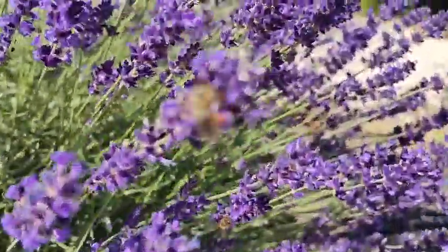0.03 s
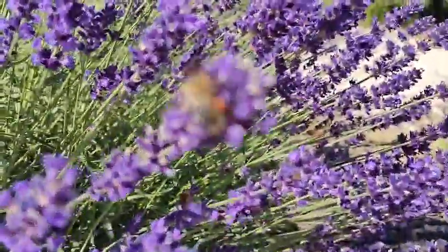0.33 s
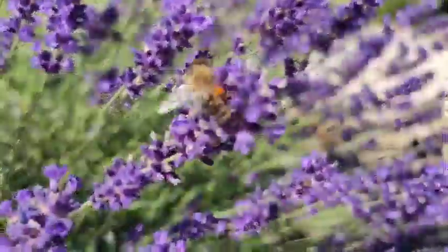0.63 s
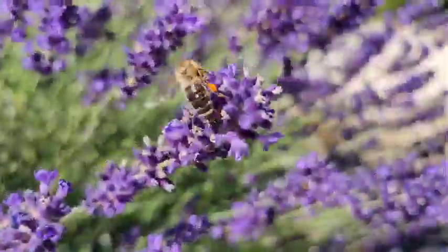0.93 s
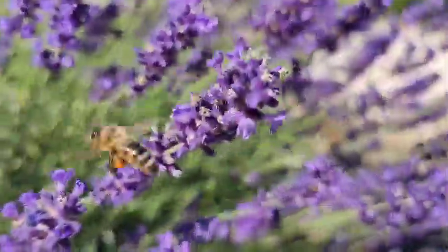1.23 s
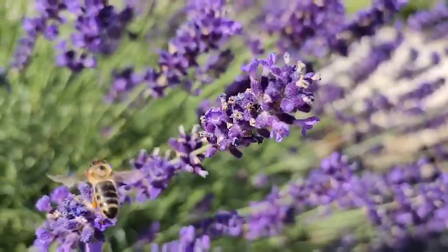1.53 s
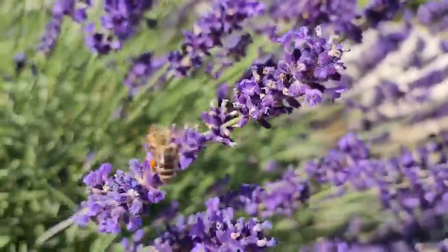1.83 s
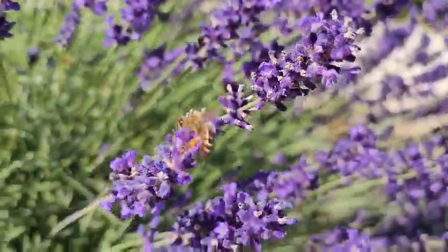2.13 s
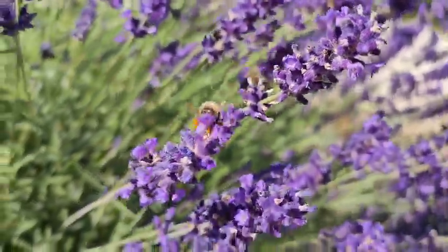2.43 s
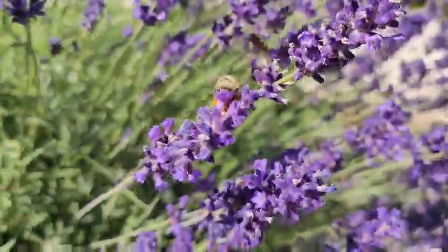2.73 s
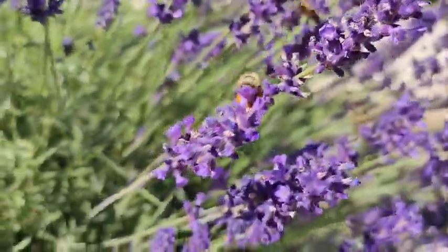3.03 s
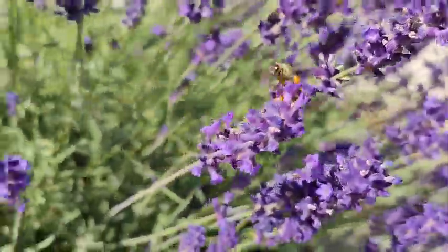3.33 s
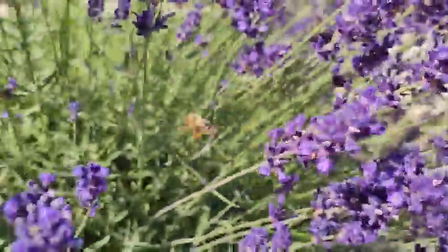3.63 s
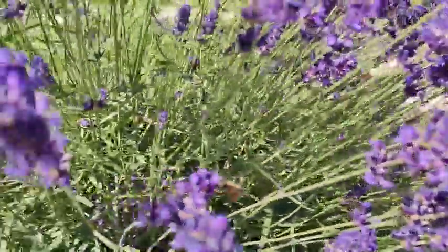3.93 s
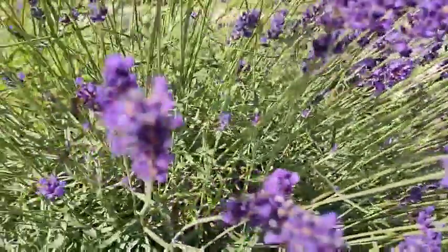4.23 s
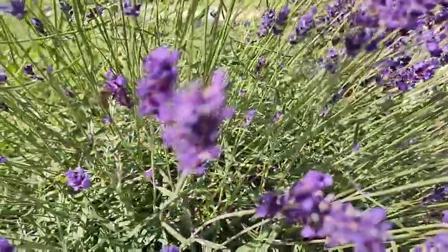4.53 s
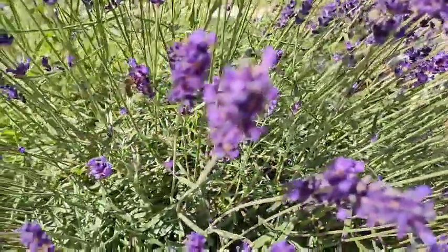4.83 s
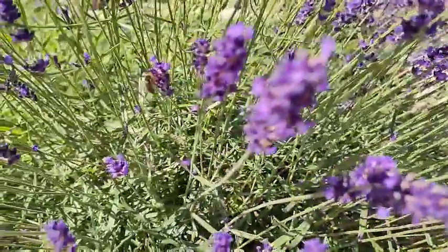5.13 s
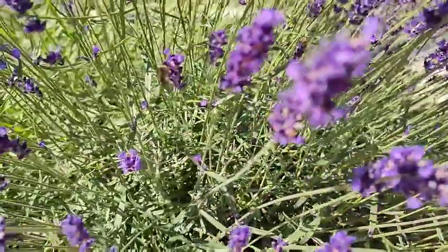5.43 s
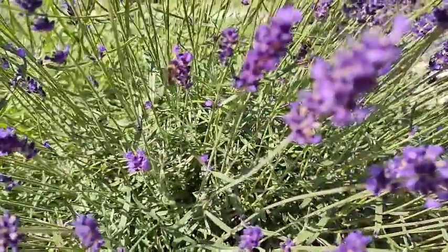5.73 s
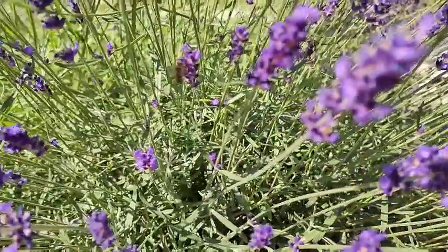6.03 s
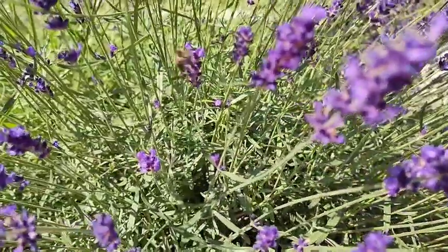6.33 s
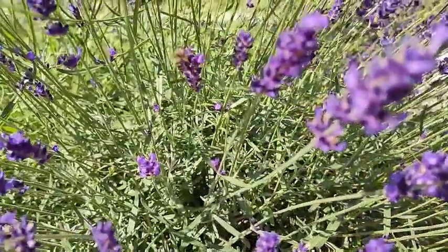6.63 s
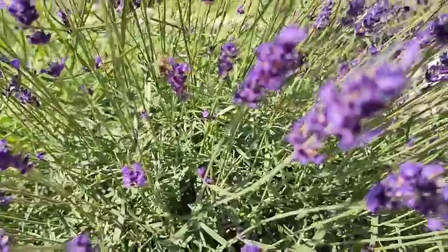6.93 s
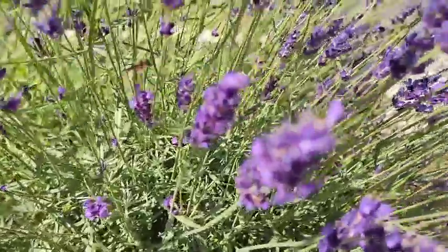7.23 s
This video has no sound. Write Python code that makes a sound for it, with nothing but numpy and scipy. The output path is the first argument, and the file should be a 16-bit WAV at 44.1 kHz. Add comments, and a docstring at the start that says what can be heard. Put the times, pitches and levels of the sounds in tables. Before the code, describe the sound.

Close to a flower bed outdoors, a burst of sharp knocks and scratchy brushing comes early on the right as a stalk hits the microphone, far louder than anything else. Around it the garden is quiet: bees buzz on and off, sometimes two at once, and leaves hiss in a gentle breeze. Two faraway engines hum over a low rumble, growing just after the knocks and then easing away.

```python
"""Honeybees in lavender.

Bees fly from flower to flower, each a harmonic buzz on an unsteady wingbeat. Leaves hiss and
stems rustle and tick in a breeze. Two distant engines drone in their lowest orders over a rumble.
A flower stalk knocks and brushes the right microphone port; the bass drops, then partly returns."""
import sys
import numpy as np
from scipy import signal
from scipy.fft import rfft, irfft
from scipy.io import wavfile

SR = 44100
rng = np.random.default_rng(int(sys.argv[2]) if len(sys.argv) > 2 else 0)


def transcribe(signal):
    """Save signal, clipped to [-1, 1], as a 16-bit WAV file at the path in sys.argv[1]."""
    frames = np.atleast_2d(signal).T
    limited = np.clip(frames, -1, 1)
    pcm = np.round(limited * 32767).astype(np.int16)
    wavfile.write(sys.argv[1], SR, pcm)


N = 321930
TIME_S, FREQS_HZ = np.arange(N) / SR, np.fft.rfftfreq(N, 1 / SR)

# wing radiation: (frequency [Hz], gain [dB])
WING_SPECTRUM = [(190, -3.5), (350, 1), (400, 1.5), (530, -3), (610, -8.5), (760, -15), (870, -13),
                 (980, -10), (1120, -16.5), (1320, -16.5), (2000, -25.5), (2800, -34)]
# flights: (peak effort [s], rise [s], fall [s], top wingbeat [Hz], level [dB],
# upper-harmonic gain from facing the microphone [dB])
BEE_FLIGHTS = [(.08, 0.11, 0.18, 188.1, -66, 5), (.44, 0.23, 0.18, 195.7, -61.5, 3.5),
               (.76, 0.2, 0.24, 194.3, -65, 7), (1.48, 0.27, 0.31, 203.6, -63.5, 7),
               (1.82, 0.086, 0.27, 173.5, -66, -1), (1.9, .14, 0.22, 189.7, -63.5, -8),
               (2.31, 0.22, 0.28, 200.4, -66, 9), (2.66, .28, .34, 198, -65.5, 0),
               (3.3, 0.34, 0.32, 196, -64, -3), (3.48, 0.36, 0.33, 189.2, -63.5, -6),
               (3.93, 0.28, .3, 197.2, -63.5, 2), (3.94, 0.23, 0.26, 184.6, -63, 0),
               (4.36, .11, 0.14, 212.3, -60, 4.5), (4.48, .09, 0.14, 193.6, -63, 5.5),
               (4.9, 0.34, 0.56, 193.3, -75, 3), (5.41, .11, 0.143, 181, -61.5, 0.5),
               (5.5, .19, 0.154, 184.6, -69, 2), (5.67, .18, 0.27, 177.3, -64.5, 4),
               (5.8, .26, 0.19, 197.5, -64, 2), (6.17, .33, .33, 184.4, -61.5, -2),
               (6.54, .15, 0.13, 184, -59.5, -8), (6.73, .15, 0.15, 183.2, -60.5, 0),
               (6.9, 0.095, 0.14, 184.2, -59, 1.5), (7.3, .2, .2, 178, -60, -2.5)]
# engine easing off, picking up: (time [s], cycle rate [Hz], firing note [dB], other orders [dB])
ENGINE_CURVE = [(0, 53.2, -48.5, -55), (.55, 52.93, -45, -55), (1.3, 51.8, -52.5, -61),
                (1.85, 51.2, -49, -53.5), (2.45, 50.4, -39, -53.5), (3.05, 49.7, -46.5, -55.5),
                (3.3, 43.3, -52.5, -52), (4.0, 38, -59, -54.5), (4.65, 36.7, -54, -62.5),
                (5.5, 40.7, -56, -63), (6.6, 41.7, -51, -61.5), (7.3, 42.2, -55.5, -60)]
# exhaust pipe resonances: (frequency [Hz], gain [dB])
EXHAUST_RESPONSE = [(40, -23), (55, -9), (112, 5), (135, 1), (155, -0.5), (182, -8.5), (208, -6.5),
                    (260, -20.5)]
# second engine, one row a gear: (loudest at [s], rise [s], fall [s], firing rate then [Hz],
# climb [Hz/s], level [dB])
GEAR_PULLS = [(2.28, 1.5, 1.02, 62.56, 12.3, -39), (5.38, .38, .55, 54.8, 8.4, -55)]
# low rumble: (frequency [Hz], level [dB])
RUMBLE_SPECTRUM = [(18, -118), (30, -103), (42, -79.5), (70, -76.5), (110, -77), (160, -80.5), (205, -84),
                   (250, -87), (400, -92), (900, -116), (4000, -150)]
# grip shifts that swell the rumble: (time [s], half width [s], gain [dB])
GRIP_SHIFTS = [(.87, 0.045, 8.5), (5.42, 0.11, 2)]
# diffuse sound at the two ports: (frequency [Hz], correlation [1])
PORT_CORRELATION = [(100, 0.76), (250, 0.62), (500, 0.58), (1000, 0), (2000, 0)]
# leaf hiss: (frequency [Hz], level [dB])
LEAF_SPECTRUM = [(100, -104), (300, -95), (500, -99), (700, -97.5), (1000, -94.5), (1400, -99.5),
                 (2000, -101), (3200, -107), (4500, -108), (5200, -111), (6600, -112), (8500, -121),
                 (12000, -126), (16000, -128)]
# leaf hiss over time: (time [s], gain [dB])
LEAF_GAIN = [(0, 4.5), (2.3, 2), (3.4, 4.5), (4.25, .3), (5.8, .5), (6.9, -0.7), (7.3, 2)]
# rustle of the nearest stems: (frequency [Hz], level [dB])
STEM_SPECTRUM = [(1500, -125), (3300, -111), (5000, -110), (6700, -109), (8300, -113), (10000, -124),
                 (15000, -130)]
# puffs of breeze on the stems: (time [s], half width [s], gain [dB])
PUFFS = [(1.75, .22, 2), (3.0, 0.5, 3), (3.8, 0.46, 2), (5.85, .25, 4), (7.2, 0.61, 0)]
# narrow treble sizzle: (frequency [Hz], gain [dB])
SIZZLE_SPECTRUM = [(2500, -43.5), (3900, -15.5), (4350, -7.5), (4600, -2), (4850, -13.5), (5400, -13),
                   (8000, -41)]
# its flares: (time [s], half width [s], level [dB])
SIZZLE_FLARES = [(5.4, 0.11, -69.5), (5.9, 0.11, -71)]
# stem ticks: (time [s], level [dB])
STEM_TICKS = [(0.114, -45.5), (1.94, -53), (2.189, -48), (2.38, -52), (5.574, -52)]
# stalk strikes: (time [s], level [dB], thud [dB], thud corner [Hz], edge [dB], snap [dB], scrape [dB])
STALK_KNOCKS = [(0.8134, -20.5, 13, 600, 12, 16, -1), (.8325, -17.5, 14.5, 900, 12, 10, -5),
                (0.9059, 0, 21, 567, 17.5, 16, -3), (0.9544, 2, 18.5, 820, 12.5, 17.5, -3),
                (1.001, 18, 1.5, 800, -2.5, 4.5, -2.5), (1.0356, -2.5, 5, 500, 13.5, 4, -3.5),
                (1.1141, 18, -1, 597.5, -2.5, -5, -12), (1.2762, -13, 21, 1054, 10, 22, -6),
                (1.4297, -17, 20, 803.6, 12, 3, -6), (1.4668, 6.5, 20, 430, 3, 20.5, -6.5)]
# plain blow on the case: (frequency [Hz], gain [dB])
CASE_RESPONSE = [(60, -27), (250, -13.5), (500, -14), (950, -7.5), (1500, -2.5), (2200, 2), (3000, -4.5),
                 (3800, -5), (4600, -2), (5400, -11.5), (6500, -15), (8500, -34), (12000, -35.5),
                 (15500, -35.5)]
# microphone port resonances: (frequency [Hz], level [dB], T60 [s])
PORT_MODES = [(2540, -52, .025), (4620, -41.5, .03)]
# stalk rubbing the case: (frequency [Hz], gain [dB])
BRUSH_SPECTRUM = [(200, -9), (700, -5), (1800, 4), (3000, 1), (4000, 7), (4600, 8.5), (5500, 2.5),
                  (6600, 0), (8000, -22.5), (15000, -18.5)]
# strokes over the case: (time [s], half width [s], level [dB])
STALK_STROKES = [(.845, 0.022, -53.5), (.97, 0.074, -50), (1.09, 0.03, -52), (1.27, 0.0052, -46),
                 (1.32, 0.026, -51), (1.41, 0.011, -48)]
# stalk resting and creeping on the case: (time [s], half width [s], level [dB])
STALK_CREEP = [(1.2, 0.24, -57)]
# microphone, dull in one treble band: (frequency [Hz], gain [dB])
MIC_RESPONSE = [(6900, -1), (7600, -10.5), (9000, -10), (10300, -12.5), (10500, 0)]


def amp(db):
    return 10 ** (np.asarray(db) / 20)


def unit_rms(x):
    return x / np.sqrt(np.mean(x ** 2) + 1e-20)


def log_interp(points, hz):
    knots_hz, values = np.transpose(points)
    return np.interp(np.log(hz + 1), np.log(knots_hz + 1), values)


def follow(rows):
    """Each value column at every sample."""
    times_s, *columns = np.transpose(rows)
    return [np.interp(TIME_S, times_s, column) for column in columns]


def colour(x, spectrum):
    return irfft(rfft(x) * amp(log_interp(spectrum, FREQS_HZ)), N)


def drift(rate_hz, at_s=TIME_S, size=7300):
    """Slow random curve, rms 1."""
    hz = np.fft.rfftfreq(size, TIME_S[-1] / size)
    slow = irfft(rfft(rng.standard_normal(size)) * np.exp(-(hz / rate_hz) ** 2), size)
    return np.interp(at_s, np.linspace(0, TIME_S[-1], size), unit_rms(slow))


def swells(rows, rest_db=-np.inf):
    """Gain: Gaussian swells summed in power over a resting level."""
    power = sum(amp(db) ** 2 * np.exp(-((TIME_S - at_s) / width_s) ** 2) for at_s, width_s, db in rows)
    return np.sqrt(amp(rest_db) ** 2 + power)


def add(mix, at_s, sound):
    part = mix[max(round(at_s * SR), 0):][:len(sound)]
    part += sound[:len(part)]


def min_phase_pulse(gain_db):
    log_gain = np.log(amp(np.r_[gain_db, gain_db[-2:0:-1]]))
    return np.fft.ifft(np.exp(np.conj(signal.hilbert(log_gain)))).real


def diffuse(spectrum):
    """Noise from all around; the ports correlate only below 1 kHz."""
    left, other = rfft(rng.standard_normal((2, N)))
    correlation = log_interp(PORT_CORRELATION, FREQS_HZ)
    right = correlation * left + np.sqrt(1 - correlation ** 2) * other
    return colour(irfft(np.array([left, right]), N), spectrum) * np.sqrt(SR / 2)


def buzz(t, wing_hz, level_db, facing_db, jitter=0.01536, fade_db=2.5, scatter_rad=0.38):
    """Wingbeat harmonics; each swells and fades as the bee turns among the stems."""
    beats = np.cumsum(wing_hz * (1 + jitter * drift(32.1, t))) / SR
    out = np.zeros((2, len(t)))
    for k in range(1, 15):
        tone_db = log_interp(WING_SPECTRUM, k * wing_hz) + facing_db * np.clip((k - 3) / 4, 0, 1)
        gain = np.sqrt(2) * amp(level_db + tone_db + fade_db * drift(6.1, t))
        phase = 2 * np.pi * (k * beats + rng.random())
        for port in out:  # plant echoes bend the phase differently at each port
            port += gain * np.cos(phase + scatter_rad * np.sqrt(k) * drift(25, t))
    return out * amp([[0.54], [-0.54]])


def bees(sag_hz=20.97, sag_db=-5, start_s=0.027, stop_s=0.029, wobble=0.01008):
    """Short flights, often two at once; wings are slower and quieter at take-off and landing."""
    out = np.zeros((2, N))
    for peak_s, rise_s, fall_s, top_hz, db, facing_db in BEE_FLIGHTS:
        aloft = (TIME_S > peak_s - rise_s) & (TIME_S < peak_s + fall_s)
        t = TIME_S[aloft]
        slack = np.maximum((peak_s - t) / rise_s, (t - peak_s) / fall_s) ** 1.8
        gate = np.clip(np.minimum((t - peak_s + rise_s) / start_s, (peak_s + fall_s - t) / stop_s), 0, 1)
        trim = 1 + wobble * drift(14.1, t)  # a hovering bee keeps trimming its wingbeat
        wing_hz = (top_hz - sag_hz * slack) * trim
        out[:, aloft] += gate * buzz(t, wing_hz, db + sag_db * slack, facing_db)
    return out


def engine_order(hz, level_db, waver_db=4.0):
    """One sine, wavering on its long path through the air."""
    gain = np.sqrt(2) * amp(level_db + waver_db * drift(3.9))
    return gain * np.sin(2 * np.pi * (np.cumsum(hz) / SR + rng.random()))


def easing_engine():
    """Two firings a cycle; the exhaust pipe shapes the other low orders."""
    cycle_hz, firing_db, others_db = follow(ENGINE_CURVE)
    out = engine_order(2 * cycle_hz, firing_db, waver_db=1.2)
    for k in (1, 3, 4, 5):
        exhaust_db = log_interp(EXHAUST_RESPONSE, k * cycle_hz)
        out += engine_order(k * cycle_hz, others_db + exhaust_db, waver_db=2.5)
    return out


def rumble():
    """Low noise; swells as the hand shifts its grip."""
    return diffuse(RUMBLE_SPECTRUM) * swells(GRIP_SHIFTS, rest_db=2)


def breeze():
    """Leaves hiss; puffs rustle the nearest stems."""
    leaves = diffuse(LEAF_SPECTRUM) * amp(follow(LEAF_GAIN)[0] + 0.263 * drift(11))
    stems = diffuse(STEM_SPECTRUM) * swells(PUFFS, rest_db=-12.5) * amp(1.3 * drift(25))
    return leaves + stems * amp([[-1], [1]])


def sizzle():
    """Flickering noise band near 4.6 kHz; flares twice."""
    band = unit_rms(diffuse(SIZZLE_SPECTRUM))
    return band * swells(SIZZLE_FLARES, rest_db=-74.5) * amp(1.1 * drift(32)) * amp([[-1.5], [1]])


def mic_fizz():
    """Even self-noise of the microphones."""
    return diffuse([(1000, -118), (9000, -118), (11000, -117.5), (13000, -118.5), (15000, -116.5)])


def stem_ticks(t60_s=0.018):
    """Faint, bright noise bursts among the stems."""
    out, t = np.zeros(N), np.arange(2048) / SR
    for at_s, db in STEM_TICKS:
        add(out, at_s, amp(db - 60 * t / t60_s) * rng.standard_normal(len(t)))
    return colour(out, [(1000, -25), (3000, -8), (4700, 2), (6500, 1), (14000, -29)]) * amp([[-5], [0]])


def pulling_engine(fade_db_per_s=18.5, clutch_s=0.12, echo_s=0.0686):
    """The firing note climbs in each gear; a wall echo cancels it at some pitches."""
    direct = np.zeros(N)
    for peak_s, rise_s, fall_s, hz, climb_hz_per_s, db in GEAR_PULLS:
        t = TIME_S - peak_s
        firing_hz = hz + climb_hz_per_s * np.clip(t, -rise_s, fall_s)
        level_db = db - fade_db_per_s * abs(t)
        in_gear = np.clip(np.minimum(t + rise_s, fall_s - t) / clutch_s, 0, 1)
        direct += in_gear * engine_order(firing_hz, level_db, waver_db=0.7)
        direct += in_gear * engine_order(2 * firing_hz, level_db - 23.5)
    return direct + np.interp(TIME_S - echo_s, TIME_S, direct)


def stalk_knocks(size=4096, scrape_rise_s=0.0057, scrape_t60_s=0.016):
    """The stalk scrapes, then snaps against the case; the port rings faintly."""
    hz, right = np.fft.rfftfreq(size, 1 / SR), np.zeros(N)
    t = (np.arange(size) - size // 8) / SR
    ring = (t > 0) * sum(amp(db - 60 * abs(t) / t60_s) * np.cos(2 * np.pi * mode_hz * t)
                         for mode_hz, db, t60_s in PORT_MODES)
    scrape_envelope = amp(-60 * np.maximum(t / scrape_t60_s, -t / scrape_rise_s))
    highpass = signal.butter(2, 700, "high", fs=SR)  # friction carries no bass
    for at_s, db, thud_db, corner_hz, edge_db, snap_db, scrape_db in STALK_KNOCKS:
        blunt_db = log_interp([(corner_hz, thud_db), (3.04 * corner_hz, 0)], hz)  # air pushed into port
        grazing_db = log_interp([(3700, 0), (6200, edge_db), (15000, snap_db)], hz)
        pulse = min_phase_pulse(log_interp(CASE_RESPONSE, hz) + blunt_db + grazing_db)
        scrape = signal.lfilter(*highpass, rng.standard_normal(size) * scrape_envelope)
        force = amp(scrape_db) * scrape / np.linalg.norm(scrape) + (t == 0) + ring
        add(right, at_s + t[0], amp(db) * signal.fftconvolve(force, pulse))
    left = colour(right, [(300, -21), (1000, -33), (3000, -58), (8000, -58)])  # only through the case
    return np.array([left, right])


def stalk_brushing(slips_per_s=2500, spread_db=2.5):
    """Tiny random slips of the stalk over the case."""
    slips = rng.standard_normal(N) * amp(spread_db * np.minimum(rng.exponential(1, N), 4))
    slips *= rng.random(N) < slips_per_s / SR
    friction = unit_rms(colour(slips, BRUSH_SPECTRUM))
    return friction * swells(STALK_STROKES + STALK_CREEP) * amp([[-21], [-0.5]])


def scene():
    """Garden, far engines and the stalk on the microphone, in stereo."""
    garden = bees() + rumble() + breeze() + sizzle() + stem_ticks()
    engines = amp(-1.5) * (easing_engine() + pulling_engine())
    return garden + engines + mic_fizz() + stalk_knocks() + stalk_brushing()


def record(dry, cutoff_hz=15950):
    """Bass dip with the stalk on the case, partly held after; microphone colour, clipping, low-pass."""
    thin = colour(dry, [(40, -1), (58, -14), (100, -15), (180, -7.0), (280, -12), (420, -0.5)])
    thin_share = follow([(0.928, 0.029), (0.94, 0.92), (1.765, 1), (1.785, 0.41)])[0]
    heard = colour(dry + thin_share * (thin - dry), MIC_RESPONSE)
    lowpass = signal.firwin(511, cutoff_hz, window=("kaiser", 9), fs=SR)
    return signal.oaconvolve(np.clip(heard, -0.95, 0.95), lowpass[None], "same")


dry = scene()
out = record(dry)
transcribe(out)
```